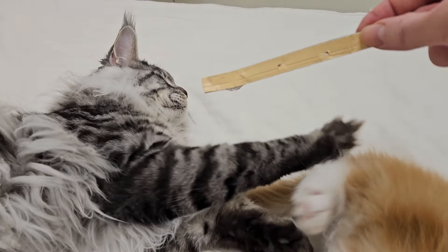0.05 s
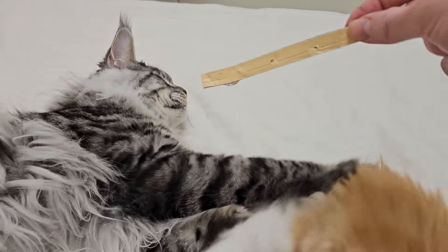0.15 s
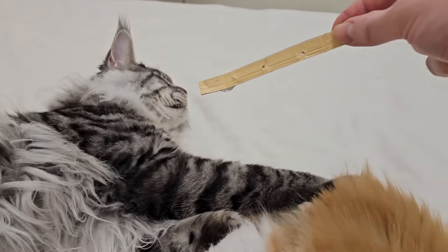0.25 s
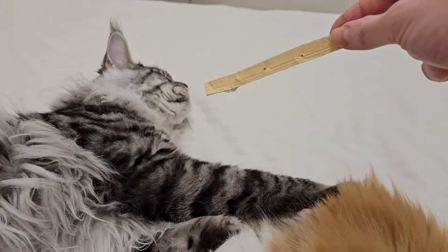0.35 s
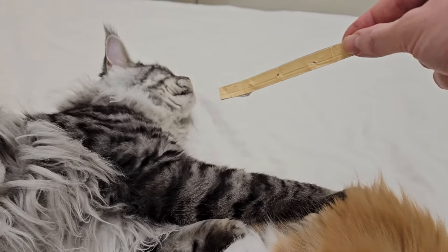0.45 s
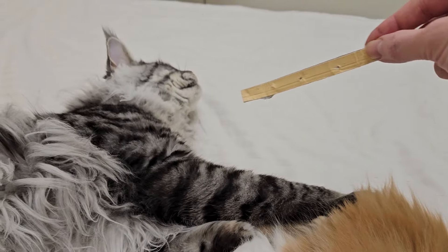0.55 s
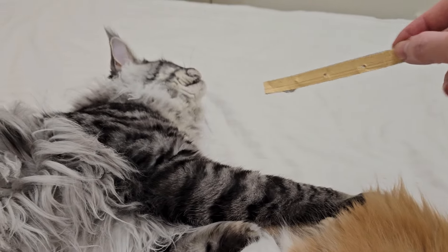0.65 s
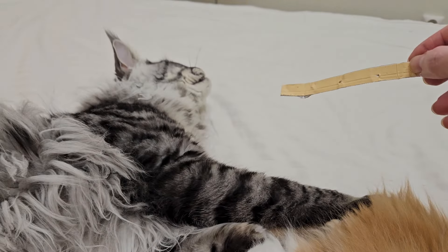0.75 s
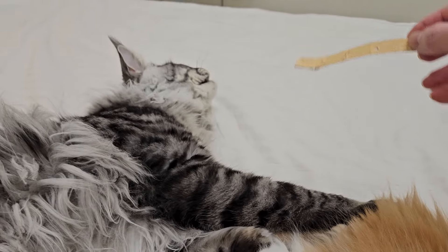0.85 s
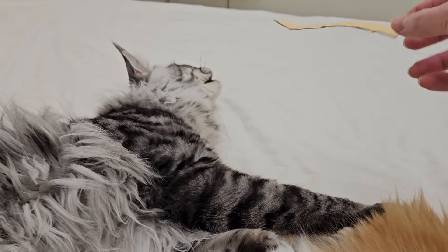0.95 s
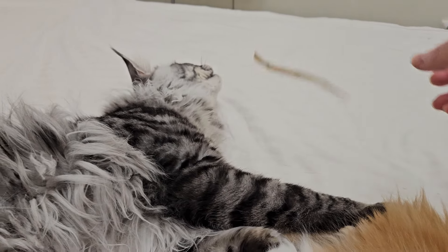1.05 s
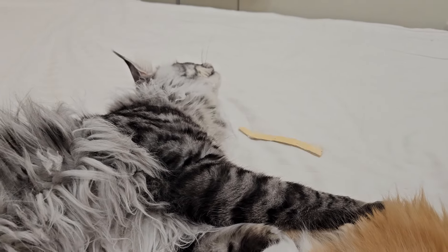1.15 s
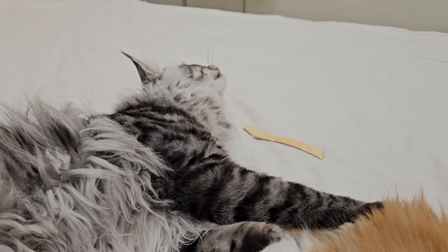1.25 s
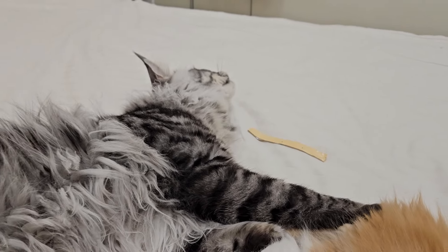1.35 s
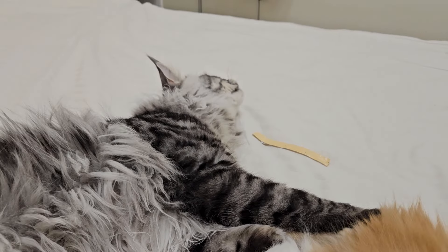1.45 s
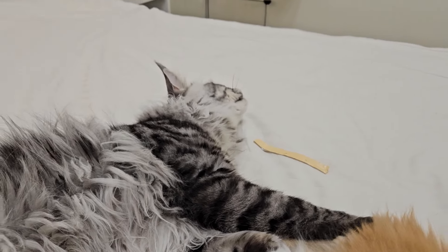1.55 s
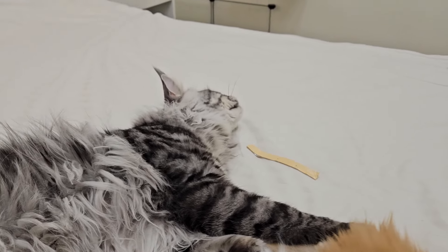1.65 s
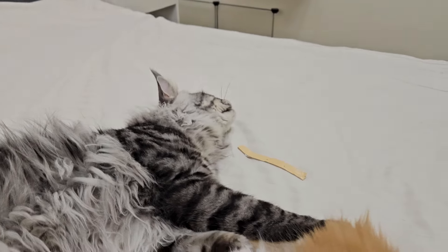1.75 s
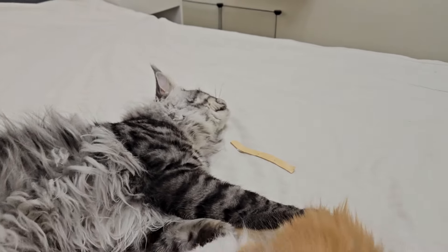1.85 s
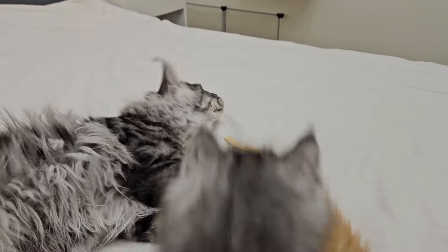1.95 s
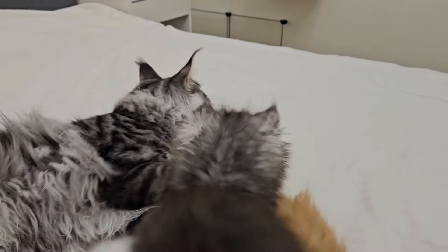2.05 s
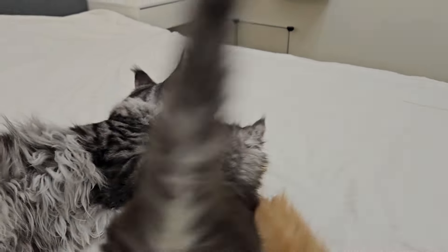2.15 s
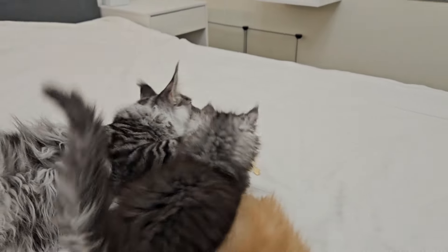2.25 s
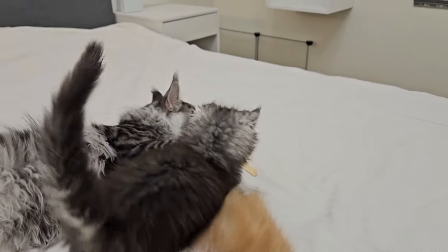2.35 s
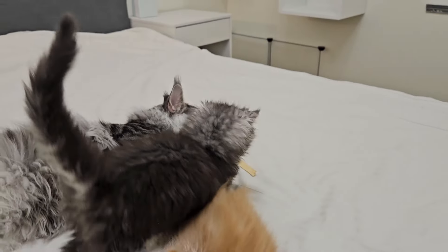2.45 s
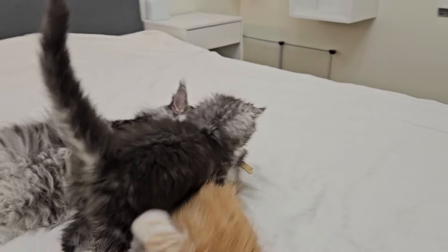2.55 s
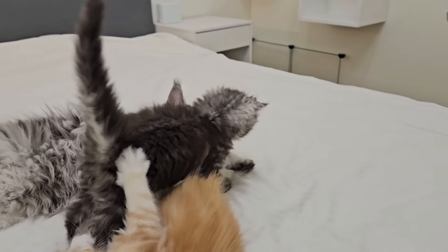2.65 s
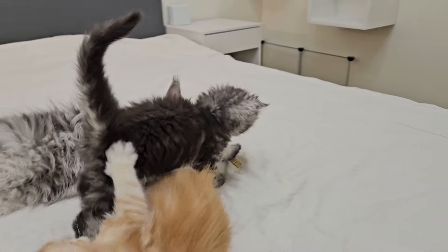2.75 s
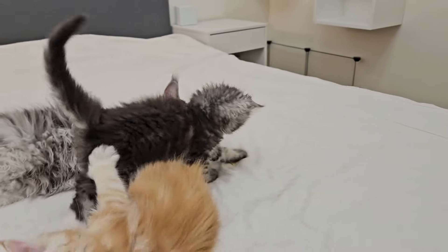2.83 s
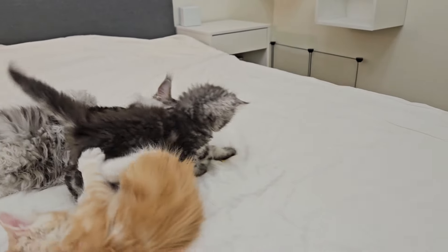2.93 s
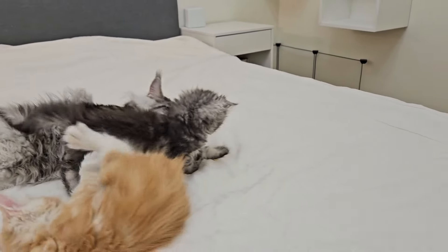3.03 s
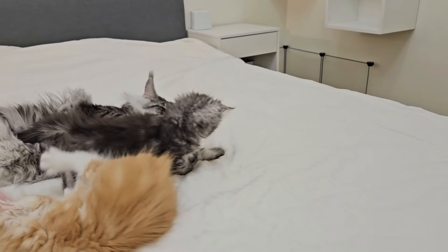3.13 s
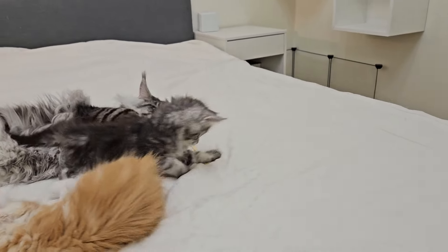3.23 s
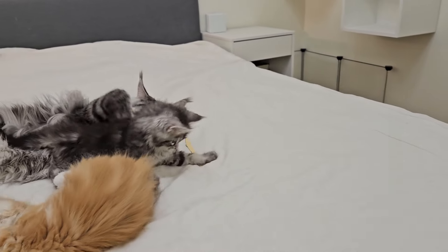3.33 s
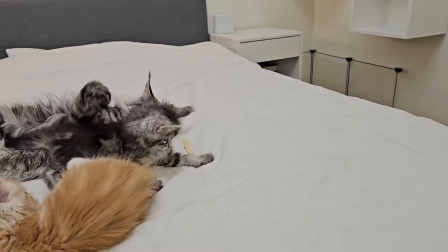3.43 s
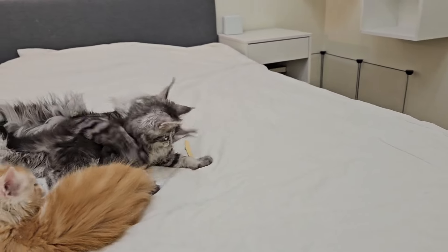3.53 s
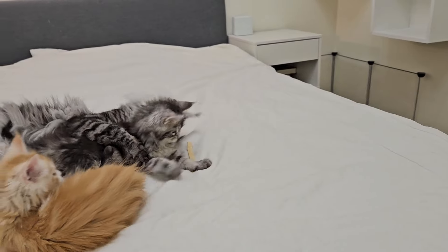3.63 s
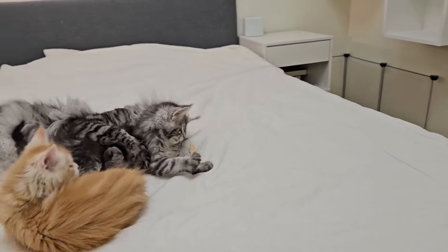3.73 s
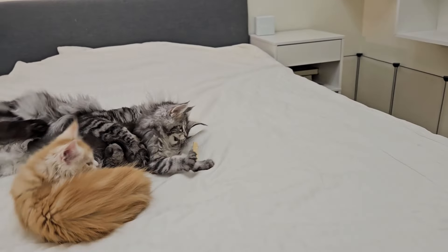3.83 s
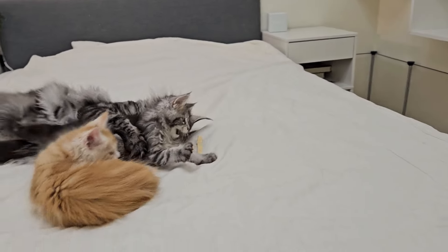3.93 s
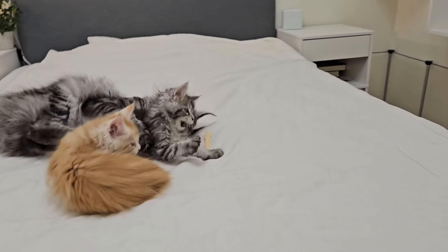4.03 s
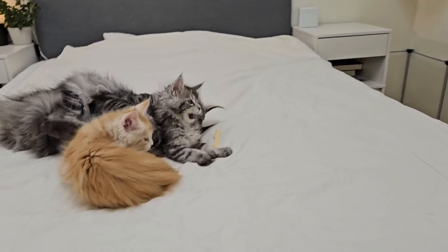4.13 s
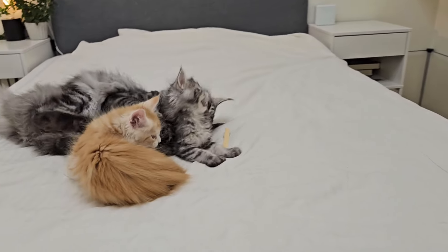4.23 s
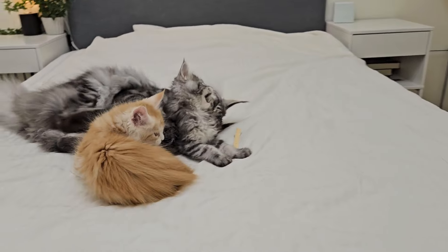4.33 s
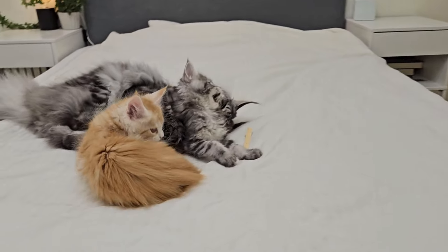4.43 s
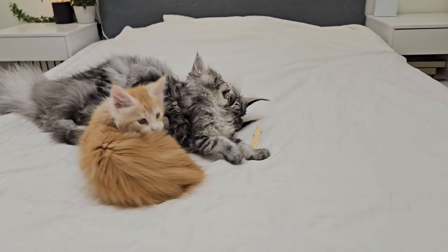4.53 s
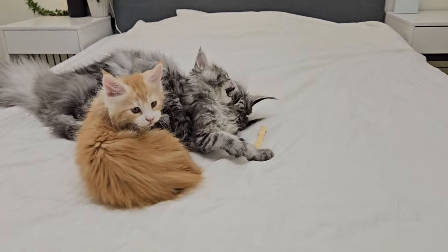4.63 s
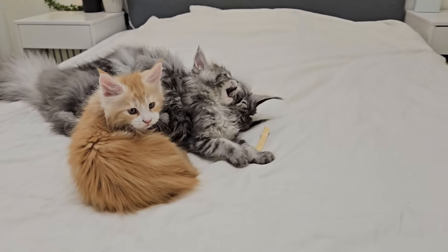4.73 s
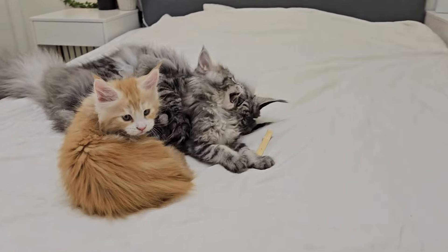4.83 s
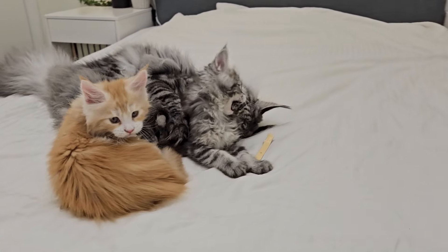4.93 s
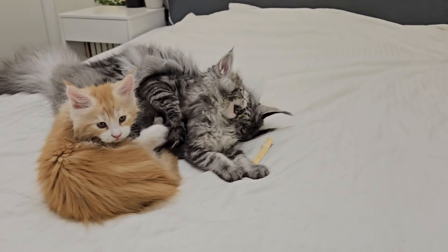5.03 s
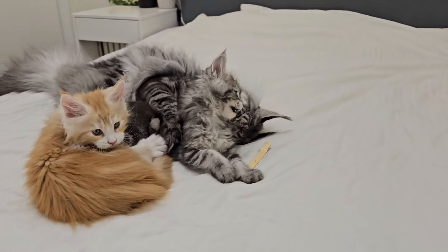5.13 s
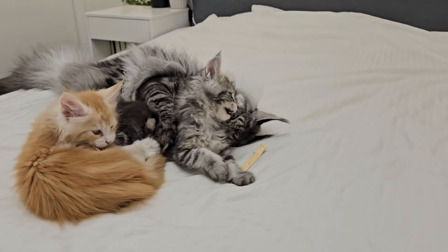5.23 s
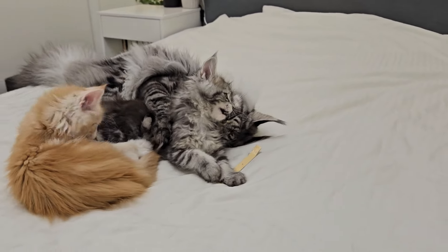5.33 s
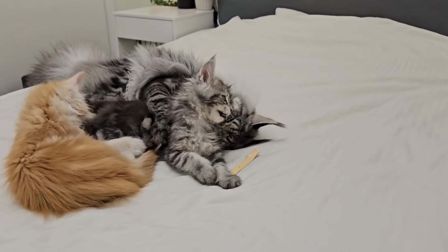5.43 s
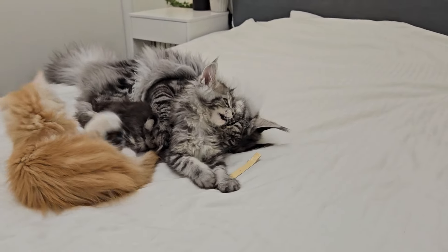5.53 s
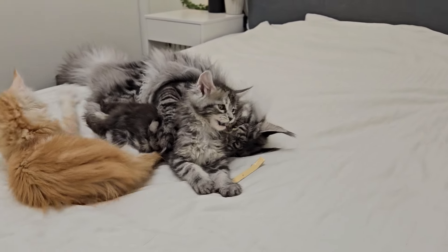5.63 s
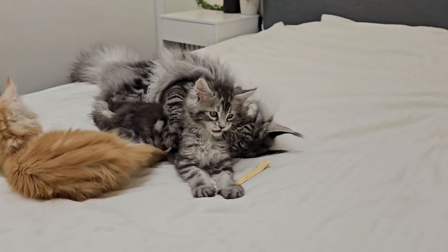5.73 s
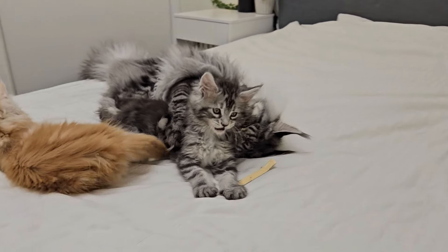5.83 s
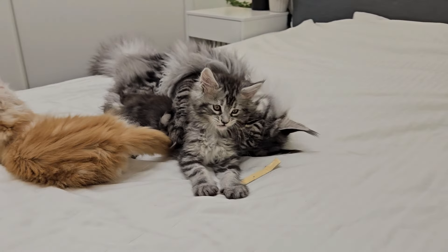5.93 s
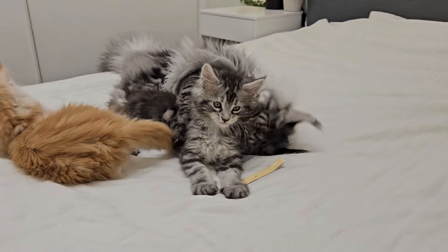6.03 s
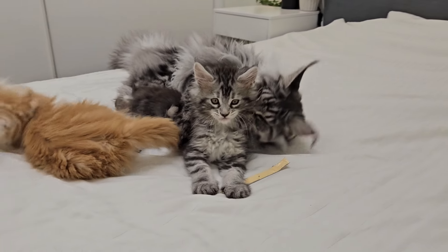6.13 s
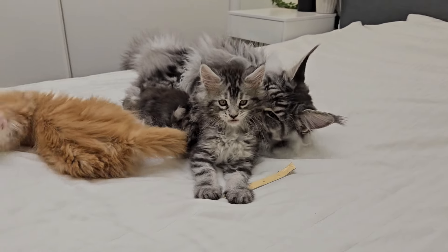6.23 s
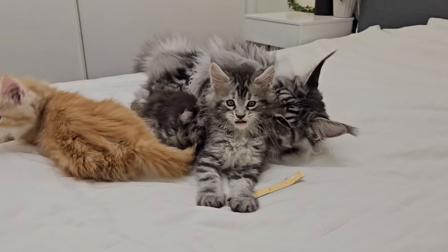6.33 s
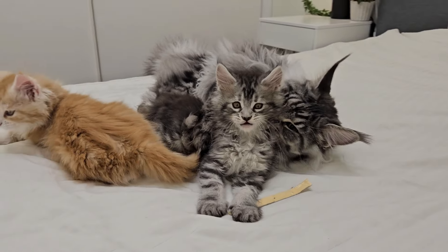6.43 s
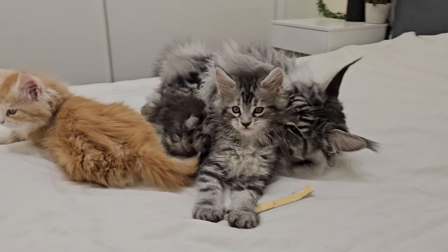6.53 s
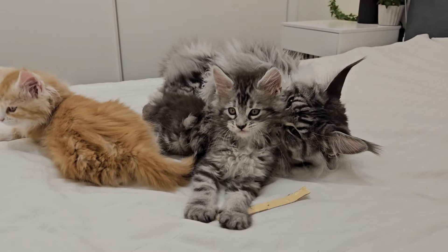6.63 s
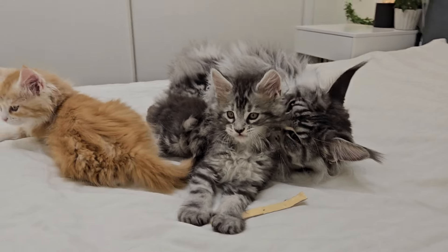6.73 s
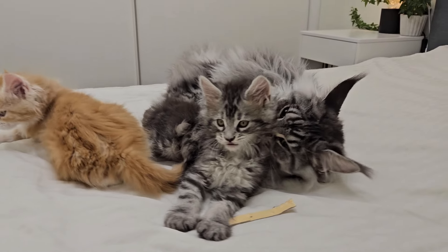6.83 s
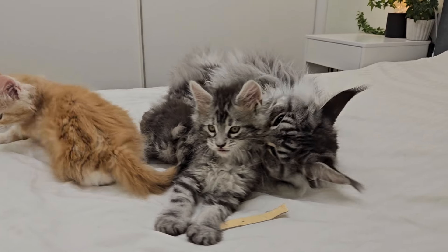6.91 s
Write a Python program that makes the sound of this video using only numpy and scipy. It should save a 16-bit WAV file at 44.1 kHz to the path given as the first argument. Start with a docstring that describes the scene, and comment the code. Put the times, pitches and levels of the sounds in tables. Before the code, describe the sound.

Close stereo handheld pickup of kittens playing on soft bedding in a small, dry room. Near silence with faint rustles is broken by a sudden deep mattress boom and brisk fabric scrape just before two seconds. Several weaker drops and low hand jolts follow. Afterwards come breathy fur strokes, dull little knocks around four and five seconds, scattered crisp ticks, and finally a soft continuous shuffle.

```python
"""A quiet bedroom, with kittens on a made bed close to a hand-held phone with two microphone ports.
From the start there is room hush, the low sway of the hand and a faint shuffle of fur, all shaped noise.
Within half a second come padded knocks in the frame's modes, mattress booms, strokes on the cover and a tick.
The scuffle is loudest near 1.9 s, with heavy drops and jolts of the hand until about 3.2 s.
Lighter strokes, knocks and a few foil or claw ticks follow, and the shuffle swells again at the end."""
import sys
import numpy as np
from scipy import signal
from scipy.fft import rfft, irfft, next_fast_len
from scipy.io import wavfile
from scipy.ndimage import uniform_filter1d, map_coordinates

SR = 44100
rng = np.random.default_rng(int(sys.argv[2]) if len(sys.argv) > 2 else 0)


def wav_record(signal):
    """Record a signal, one row per channel, as 16-bit PCM in the file named by sys.argv[1]."""
    frames = np.transpose(np.atleast_2d(signal))
    bounded = np.clip(frames, -1, 1)
    # unit amplitude maps onto the largest positive 16-bit level
    quanta = np.round(bounded * 32767).astype(np.int16)
    wavfile.write(sys.argv[1], SR, quanta)


N = 307414

# Levels are set ahead of the microphone ports. Spectra give only the shape: rush() scales the noise to rms 1.
# Room hush and hand rumble: freq_hz, density_db (per Hz)
HUSH_SPECTRUM = [(35, -58), (60, -18), (115, -5), (139, -10.5), (152, -19.5), (196, -16), (278, -21),
                 (404, -24.5), (690, -28.5), (1300, -31), (2540, -38.5), (5500, -39), (8500, -42.5),
                 (12000, -80), (15700, -52)]
RUMBLE_SPECTRUM = [(10, -18), (18, -8), (28, 3.5), (45, -5.5), (70, 1), (100, -60)]
HUSH_DB, STEADY_HAND_DB = -64.5, -81
# The hand jolts the phone: centre_s, level_db (6 dB above the rounded top), slope_ms (per 10 dB, both ways)
HAND_JOLTS = [(0.07, -62.4, 69.0), (0.23, -47, 35.0), (0.6, -61, 125.0), (0.93, -67, 63),
              (1.21, -62, 105.0), (1.75, -58.5, 85.0), (1.94, -50, 52.0), (2.12, -42, 35.0),
              (2.25, -42, 59), (2.53, -54, 266.0), (2.9, -52, 61), (3.21, -44.5, 61), (3.41, -63, 47.0),
              (3.75, -61, 192.0), (4.45, -54, 93), (4.88, -64, 198.0), (5.39, -60, 165.0),
              (5.83, -58, 134.5), (6.21, -57.5, 266.0), (6.67, -52, 58), (6.82, -60, 266.0)]

# Restless fur between strokes: time_s, drag_db
FUR_SHUFFLE = [(0, -72.5), (.2, -73), (.4, -83), (.72, -92), (1.25, -83.5), (1.42, -76.5), (1.55, -69.5),
               (1.8, -64), (2.1, -85), (3.1, -94), (3.62, -60.5), (4.06, -69), (5.2, -88), (6.4, -73.5),
               (6.55, -72), (6.97, -63.7)]
# The shuffle's other layers, relative to its drag: weight_db, rasp_db, sheen_db
SHUFFLE_LAYERS_DB = (-0.8, -0.5, 2)
# Fur and paws on the cover: centre_s, drag_db (6 dB above the rounded top), rise_ms, fall_ms (per 10 dB),
# then relative to the drag: weight_db, rasp_db (claws in the weave), sheen_db
COVER_STROKES = [(0.259, -51.5, 9.5, 52, -10.5, -2.5, -5), (0.415, -67, 21.0, 69.0, -3, -3.0, 4),
                 (0.56, -73.5, 10.0, 270.0, -2.5, -2, -1.5), (0.99, -80.2, 133.0, 75.0, 5.0, 4.0, 10.0),
                 (1.165, -67, 18, 55, -2, 4, 3), (1.306, -59.5, 13, 64, -11, -1.5, -5.0),
                 (1.8, -64, 16, 60.0, 10, 13, -6.0), (1.878, -32.5, 27, 57.0, 5.5, -1, -4.5),
                 (2.043, -54, 19.0, 69, 3, -4, 0.0), (2.181, -53.5, 39, 128.5, 0, -0.5, -1.0),
                 (2.344, -59.1, 18, 42.0, -5, 0, 2.0), (2.548, -52.5, 112.0, 285.0, -1.5, -4.5, -2),
                 (2.668, -58, 148.0, 24.0, -5.5, 2.0, 4.5), (2.751, -44, 15, 125.0, -4, -0.5, -2),
                 (2.957, -46, 51.0, 48, 8.5, 8, -1.5), (3.05, -53, 18.0, 39, -3, 1.5, 1.0),
                 (3.279, -57, 201, 17, 1, -2, -0.5), (3.441, -51, 167, 75, -1.0, 0.5, -1.0),
                 (3.723, -50, 15, 55.0, -1.5, -5, -3), (3.849, -52.2, 48.0, 21.0, -4, -0.5, 1.5),
                 (3.983, -51.2, 110, 32, -5.5, 2, -4), (4.329, -53, 85, 48, -1.5, -1, -1),
                 (4.55, -54, 81, 167, 0, -3, 0.5), (4.69, -58, 11.0, 311, -2.5, 1.0, 0),
                 (4.92, -57, 21, 120, -2, -0.0, 2), (5.0, -60, 82, 80.0, -8.5, 1, -3),
                 (5.061, -51, 9.5, 63, -16, 0, -6), (5.26, -60.6, 57.0, 29, 8.5, 5, -5),
                 (5.323, -59, 68.0, 178.0, -0.5, 0, 2.5), (5.62, -59, 96.0, 275, -0.5, -3.5, -0.5),
                 (6.004, -54, 133.0, 15.0, -1.5, -3, 0.5), (6.04, -53, 74.0, 94, -2.5, -2, 0.5),
                 (6.33, -56, 183.0, 99, -3.0, -3.5, 2), (6.46, -58, 77, 29.0, -7, -2, 1.5),
                 (6.704, -51, 67, 28, -5.5, -6.0, 0), (6.83, -55.5, 264.0, 86.0, -5.0, -5, -8)]
# Colours of drag, weight, rasp and sheen: freq_hz, density_db (per Hz)
DRAG_SPECTRUM = [(1500, -32), (2500, -12), (3200, -11), (4700, -11.5), (6000, -19), (7500, -29),
                 (11000, -32)]
WEIGHT_SPECTRUM = [(250, -9), (500, -3), (850, -3), (1250, -2.5), (1600, -2.5), (2000, -23), (3200, -74)]
RASP_SPECTRUM = [(1100, -31), (1550, -11), (1800, -3.5), (2150, -0.5), (2500, -7), (3300, -15.5),
                 (5000, -70)]
SHEEN_SPECTRUM = [(3240, -10), (5500, -2), (6700, 0.5), (7400, 2), (8500, -3.5), (10500, -3.5),
                  (13000, -14.5), (15700, -18)]

# Padded knocks: start_s, level_db (nominal peak), pitch_hz, t60_s (of the echoes)
PADDED_KNOCKS = [(0.186, -55, 440, 0.16), (1.143, -53, 256, 0.16), (1.166, -42, 297, 0.056),
                 (1.799, -48, 880, 1), (1.887, -25.5, 470, 0.43), (1.898, -27.5, 252, 0.54),
                 (2.157, -36, 390, 0.44), (2.214, -40.5, 360, 0.35), (2.351, -49.5, 554, 0.42),
                 (2.466, -58.5, 664, 0.41), (2.535, -32.5, 378, 0.74), (2.753, -37, 545, 0.23),
                 (2.836, -37, 487, 0.41), (2.954, -44.5, 845, 0.27), (3.158, -43, 267, 0.45),
                 (3.552, -38, 403, 0.39), (3.748, -48, 400, 0.99), (3.862, -46, 358, 0.15),
                 (3.973, -46, 594, 0.4), (4.009, -51, 630, 0.25), (4.306, -38.5, 470, 0.46),
                 (4.345, -45.5, 476, 0.3), (4.392, -57, 470, 0.67), (4.572, -40.5, 570, 0.48),
                 (4.706, -45, 443, 0.59), (4.767, -45, 550, 0.23), (4.798, -44, 560, 0.54),
                 (4.86, -36.5, 373, 0.31), (4.891, -39, 477, 0.18), (5.113, -54.5, 530, 0.21),
                 (5.197, -52, 550, 0.53), (5.257, -50, 696, 0.21), (5.425, -58.5, 700, 1),
                 (5.689, -53, 271, 0.36), (5.758, -53, 494, 0.21), (5.803, -45.5, 470, 0.44),
                 (5.855, -51, 555, 0.26), (6.202, -52.5, 711, 0.38), (6.548, -54, 473, 1)]
# What the bed frame rings with: mode_hz, width_hz, gain_db
FRAME_MODES = [(177, 27, 4.5), (298, 70, 4), (357, 47, -1.5), (439.5, 28.5, 1.5), (477.7, 27, -3.5),
               (544, 17.7, 4.5), (608, 69, -5), (687, 45, 4), (784, 49, -5), (851, 78, 3), (1003, 42, 2.5),
               (1080, 51, 2)]
# Bodies on the mattress: start_s, level_db (nominal peak before narrowing), pitch_hz, t60_s (of the echoes)
MATTRESS_THUMPS = [(0.189, -43.5, 132, 0.2), (0.224, -47, 110, 0.24), (1.161, -45, 139, 0.22),
                   (1.188, -49.5, 111, 0.41), (1.887, -19, 121, 0.16), (1.909, -20.5, 119, 0.36),
                   (2.09, -41, 111, 0.94), (2.171, -29, 110, 0.39), (2.199, -26.5, 106, 0.13),
                   (2.255, -30, 128, 0.16), (2.295, -33, 115, 0.088), (2.424, -50, 153, 0.62),
                   (2.531, -33.5, 176, 0.45), (2.852, -37.5, 106, 0.29), (3.159, -34, 110, 0.19),
                   (3.186, -30.5, 97, 0.17), (3.215, -31.5, 105, 0.098), (3.755, -48.5, 210, 0.53),
                   (3.849, -47, 121, 0.23), (4.305, -45, 150, 0.46), (4.382, -41.5, 179, 0.22),
                   (4.475, -50, 118, 0.33), (4.584, -46.5, 205, 0.29), (4.791, -46.5, 154, 0.25),
                   (5.138, -54, 110, 0.17), (5.753, -41.5, 116, 0.39), (5.954, -53, 113, 0.25),
                   (6.175, -49.5, 114, 0.71), (6.599, -48, 92, 0.24)]
# Foil and claw ticks: start_s, level_db (nominal peak), pitch_hz, t60_s (of the echoes), left_right_db
FOIL_CLAW_TICKS = [(0.487, -52.5, 1190, 0.016, -12), (.579, -62, 7400, 0.12, 1),
                   (1.145, -54, 4440, 0.029, 1), (1.16, -46.5, 4940, 0.027, 3), (1.164, -47, 6600, 0.03, 3),
                   (1.168, -50, 5000, 0.07, -4), (1.165, -42, 980, 0.025, -3), (2.154, -46, 1090, 0.087, 0),
                   (2.739, -41, 2230, 0.053, 4), (2.769, -40.5, 3500, .1, -5),
                   (3.411, -41, 2500, 0.036, -1), (4.712, -39.5, 2260, 0.032, 5),
                   (5.06, -43, 2790, 0.079, 1), (5.115, -46.5, 1200, 0.039, -2),
                   (5.204, -55, 1600, 0.047, 7)]
CREST_DB = 9  # a blow's nominal peak above the rms of its start
BLOW_S = 0.4  # every blow is cut off after this

# Likeness of the two channels: freq_hz, correlation (-1 to 1)
CHANNEL_LIKENESS = [(30, 0.21), (80, 0.99), (150, 0.68), (300, 0.59), (600, 0.54), (1000, -0.028),
                    (1400, -0.11), (2000, -0.051), (3000, -0.0032), (6000, 0.018), (15000, -0.0099)]
# How the two ports differ: freq_hz, left_right_db
PORT_LEAN = [(60, 0.5), (300, 3.5), (700, 0), (1290, 1), (2380, 4.5), (4400, 0), (6000, 0.5), (8120, 6.5),
             (10500, 3.5), (15000, 1.5)]
# Peaks and a notch of the microphone duct: freq_hz, gain_db
DUCT_COLOUR = [(6800, 1.5), (7250, 4), (7900, 3.5), (8650, 8.5), (9250, -4), (9800, -15.5), (10400, -7.5),
               (11400, 0.5), (12500, 7)]
TOP_HZ = 15720  # band limit


def amp(db):
    """Decibels to amplitude gain."""
    return 10 ** (np.asarray(db) / 20)


def unit(x):
    """Scale to rms 1."""
    return x / np.sqrt(np.mean(x ** 2) + 1e-20)


def along(points, hz):
    """Interpolate (frequency, value) points on a log frequency axis."""
    f, values = np.transpose(points)
    return np.interp(np.log(hz + 1), np.log(f + 1), values)


def wobble(rate_hz):
    """A smooth random curve through rate_hz random knots a second."""
    knots = rng.standard_normal(int(N * rate_hz / SR) + 4)
    return map_coordinates(knots, [np.arange(N) * rate_hz / SR])


def filtered(x, response):
    """Multiply the spectrum of x by a response of frequency, with zero padding."""
    n = x.shape[-1]
    padded = next_fast_len(n + 4096)
    hz = np.fft.rfftfreq(padded, 1 / SR)
    return irfft(rfft(x, padded) * response(hz), padded)[..., :n]


def resonance(hz, width_hz):
    """Response of a causal band-pass with gain 1 at its centre."""
    return lambda f: 1j * f * width_hz / (hz * hz - f * f + 1j * f * width_hz)


def spread(pair):
    """Mix two unrelated signals into left and right with the likeness set for each frequency."""
    def mid_side_gains(hz):
        angle = np.arccos(np.clip(along(CHANNEL_LIKENESS, hz), -1, 1)) / 2
        return np.array([np.cos(angle), np.sin(angle)])

    mid, side = filtered(pair, mid_side_gains)
    return np.array([mid + side, mid - side])


def rush(spectrum, patchy_db, grain_db):
    """Stereo noise of rms 1, patchy in time and colour, with fast fibre-sized grains of level."""
    bins = signal.stft(rng.standard_normal((2, N)), nperseg=512)[2]
    patches = rng.standard_normal(bins.shape[1:])
    patches = uniform_filter1d(patches, size=6, axis=0)  # over frequency
    patches = uniform_filter1d(patches, size=10, axis=1)  # over time
    pair = signal.istft(bins * amp(patchy_db * unit(patches)), nperseg=512)[1][:, :N]
    pair = pair * amp(grain_db * wobble(350))
    coloured = filtered(pair, lambda hz: amp(along(spectrum, hz)))
    return unit(spread(coloured))


def swell(centre_s, level_db, rise_ms, fall_ms):
    """Power of one gesture: exponential rise and fall meet in a rounded top."""
    ms = 1000 * (np.arange(N) / SR - centre_s)
    before = amp(np.minimum(-10 * ms / rise_ms, 200))  # capped against overflow
    after = amp(np.minimum(10 * ms / fall_ms, 200))
    return (amp(level_db) / (before + after)) ** 2


def add_blow(out, start_s, level_db, t60_s, response, push, rise_s, left_right_db):
    """A first push, then scattered echoes that die away, all through the struck body's colour."""
    t = np.arange(round(BLOW_S * SR)) / SR
    echoes = spread(rng.standard_normal((2, len(t))))
    echoes *= (1 - np.exp(-t / rise_s)) * amp(-60 * t / t60_s)
    echoes[:, 0] -= push
    blow = filtered(echoes, response)
    opening = blow[:, :round(min(t60_s, 0.3) * SR / 8)]
    blow *= amp(level_db - CREST_DB) / np.sqrt(np.mean(opening ** 2))
    blow *= amp([[left_right_db / 2], [-left_right_db / 2]])
    out[:, round(start_s * SR):][:, :len(t)] += blow


def room():
    """Steady broadband hush, and low rumble that grows when the hand jolts the phone."""
    hush = amp(HUSH_DB + 0.32 * wobble(2.2)) * rush(HUSH_SPECTRUM, patchy_db=0.6, grain_db=2.5)
    rumble = rush(RUMBLE_SPECTRUM, patchy_db=0, grain_db=0)
    hand_power = amp(2 * STEADY_HAND_DB)
    for centre_s, level_db, slope_ms in HAND_JOLTS:
        hand_power = hand_power + swell(centre_s, level_db, slope_ms, slope_ms)
    return hush + np.sqrt(hand_power) * rumble


def cover():
    """Fur drags on the weave in four noise layers, fed by each stroke and the shuffle between."""
    shuffle_s, shuffle_db = np.transpose(FUR_SHUFFLE)
    shuffle_power = amp(2 * np.interp(np.arange(N) / SR, shuffle_s, shuffle_db))
    power = shuffle_power * amp(2 * np.array([0, *SHUFFLE_LAYERS_DB]))[:, None]
    for centre_s, drag_db, rise_ms, fall_ms, *layers_db in COVER_STROKES:
        layer_gains = amp(2 * np.array([0, *layers_db]))[:, None]  # power gains
        power = power + swell(centre_s, drag_db, rise_ms, fall_ms) * layer_gains
    drag, weight, rasp, sheen = np.sqrt(power) * amp(0.52 * wobble(45))  # one shared flutter
    return (drag * rush(DRAG_SPECTRUM, patchy_db=1.5, grain_db=0.8)
            + weight * rush(WEIGHT_SPECTRUM, patchy_db=1.82, grain_db=0.5)
            + rasp * rush(RASP_SPECTRUM, patchy_db=1.76, grain_db=1.5)
            + sheen * rush(SHEEN_SPECTRUM, patchy_db=2.0, grain_db=0.3))


def frame(f):
    """Response of the bed frame: a direct part plus modes of alternating sign."""
    response = 0.66
    for k, (mode_hz, width_hz, gain_db) in enumerate(FRAME_MODES):
        response = response + (-1) ** k * amp(gain_db) * resonance(mode_hz, width_hz)(f)
    return response


def knocks():
    """A soft contact is heard at once and in frame modes near its pitch, with the treble rolled off."""
    out = np.zeros((2, N + SR))
    for start_s, level_db, hz, t60_s in PADDED_KNOCKS:
        hump = resonance(hz, 340 * (400 / hz) ** 0.43)  # higher knocks are narrower
        add_blow(out, start_s, level_db, t60_s, lambda f: hump(f) ** 2 * frame(f) / (1 + 1j * f / 1300),
                 push=30, rise_s=0.001, left_right_db=-2)
    return out[:, :N]


def thumps():
    """The mattress answers each drop with a boom so low that both ports hear nearly the same."""
    out = np.zeros((2, N + SR))
    for start_s, level_db, hz, t60_s in MATTRESS_THUMPS:
        boom, skirt = resonance(hz, 36), resonance(hz, 170)
        add_blow(out, start_s, level_db, t60_s, lambda f: boom(f) * skirt(f) ** 2,
                 push=21, rise_s=0.0032, left_right_db=-6)
    mid = out.mean(axis=0)
    return (mid + 0.27 * (out - mid))[:, :N]  # narrow the stereo image


def ticks():
    """Foil and claws crackle briefly through a broad resonance around each tick's pitch."""
    out = np.zeros((2, N + SR))
    for start_s, level_db, hz, t60_s, left_right_db in FOIL_CLAW_TICKS:
        edge = resonance(hz, 1.2 * hz)
        add_blow(out, start_s, level_db, t60_s, lambda f: edge(f) ** 2 / (1 + 1j * f / 8000),
                 push=3.5, rise_s=0.0006, left_right_db=left_right_db)
    return out[:, :N]


def scene():
    """Everything on and around the bed, summed ahead of the microphone ports."""
    return room() + cover() + knocks() + thumps() + ticks()


def record(dry):
    """The duct colours the treble, the two ports lean apart, and nothing stays above the band limit."""
    def ports(hz):
        lean_db = np.outer([0.5, -0.5], along(PORT_LEAN, hz))
        return amp(along(DUCT_COLOUR, hz) + lean_db) * (hz < TOP_HZ)

    return filtered(dry, ports)


dry = scene()
out = record(dry)
wav_record(out)
```